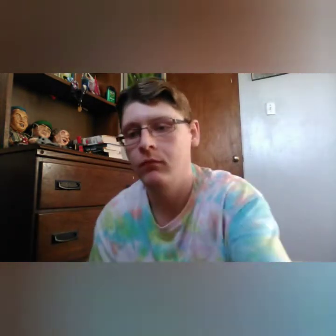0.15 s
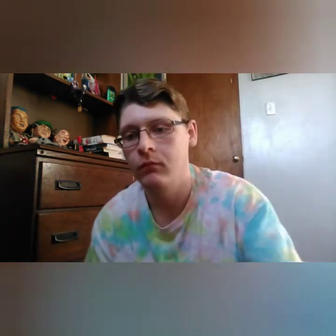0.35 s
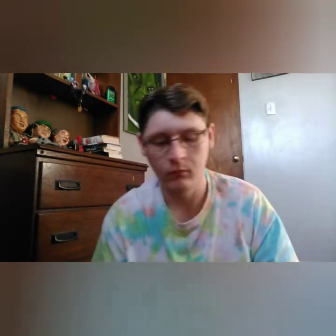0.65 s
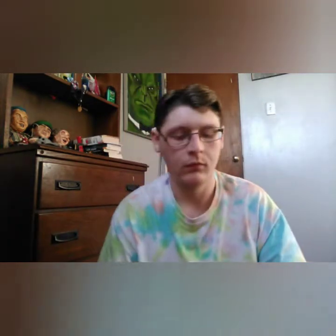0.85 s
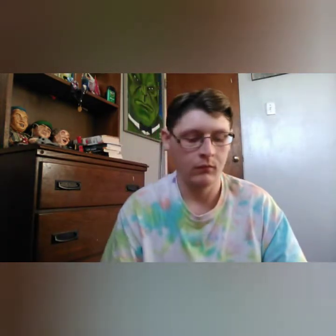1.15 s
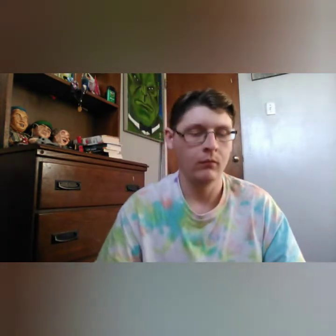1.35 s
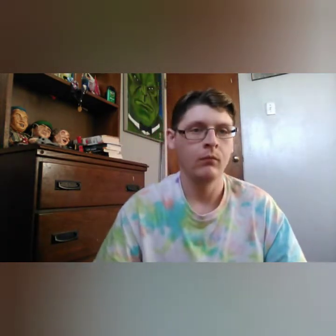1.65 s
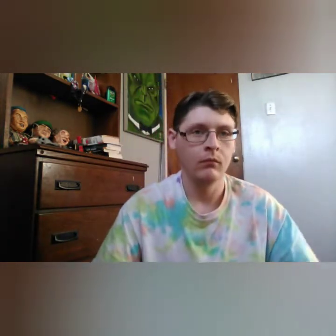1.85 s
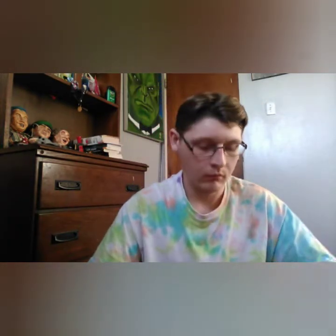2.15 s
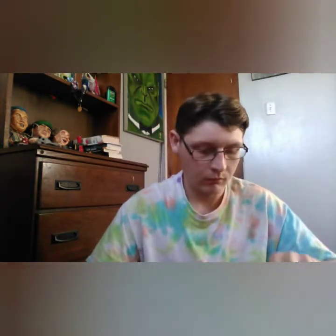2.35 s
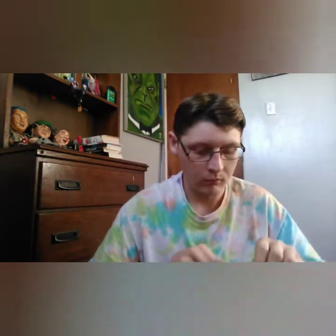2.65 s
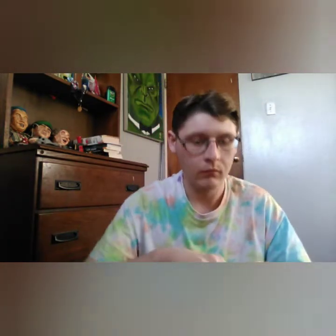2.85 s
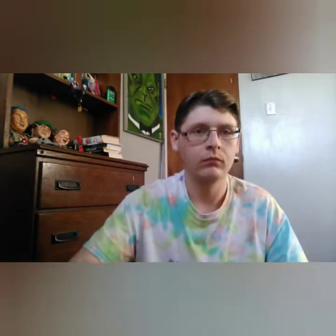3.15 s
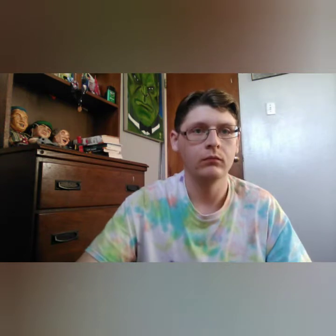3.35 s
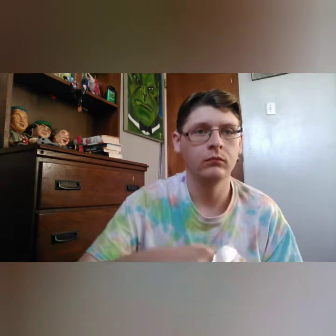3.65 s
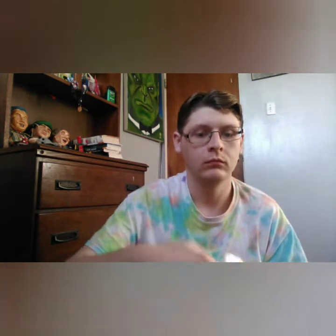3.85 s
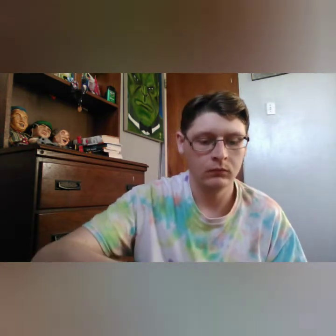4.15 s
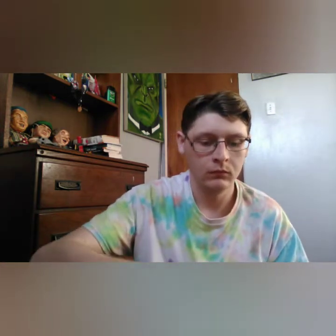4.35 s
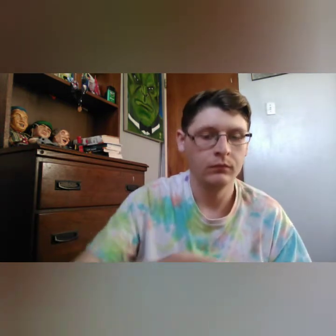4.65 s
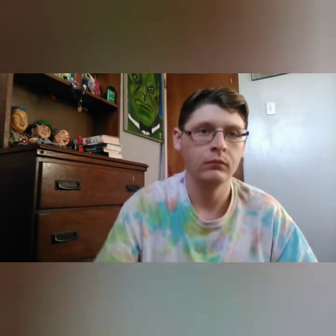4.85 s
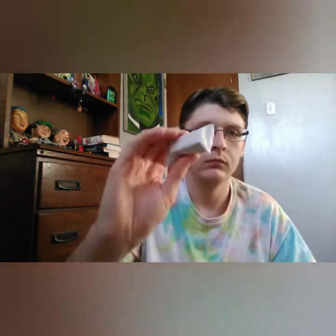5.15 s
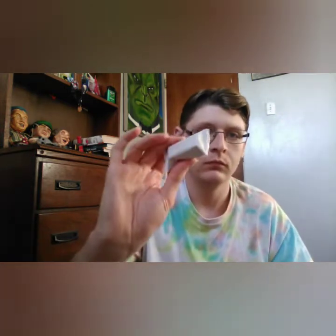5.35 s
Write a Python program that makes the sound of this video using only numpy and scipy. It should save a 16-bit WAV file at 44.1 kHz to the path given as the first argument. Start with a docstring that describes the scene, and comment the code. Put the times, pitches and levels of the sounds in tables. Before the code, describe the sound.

A close stereo phone microphone in a small bedroom catches a stiff plastic candy wrapper handled over a table. For the first 0.7 seconds there are mainly soft, dull thumps, a tiny crisp tick at 0.24, low rumble and a faint wavering drone that then fades. From 0.8 the wrapper crackles in scattered dry snaps, moving from the right to the centre. Snaps thicken from 1.5, and between 1.9 and 2.2 it tears open in a loud, bright, dense burst with short hollow pops. A quieter gap follows, with a crisp crackle and papery pops around 2.7 to 2.9. From 3.2 to 4.6 irregular crumpling continues, sharp cracks over fine grainy rustle, strongest near 3.3, 3.6, 4.1 and 4.2. It thins out, with crackles around 5.0 to 5.15, near quiet, and a last thin, sharp snap at 5.4. Brief room echoes and light hiss remain.

```python
"""Candy wrapper torn open and crumpled

A stiff plastic wrapper is picked up, torn open and crumpled by hand on a table in a small bedroom, caught by a
two-port phone microphone. Creases snap as short noise cracks, swarms of tiny buckles rustle as grainy noise, and
the air pocket pops as brief sagging tones. The table and walls answer with echoes. Soft thumps, a low house rumble,
a fading drone and hiss lie behind."""
import sys
import numpy as np
from scipy import signal
from scipy.fft import rfft, irfft, next_fast_len
from scipy.io import wavfile
from scipy.ndimage import uniform_filter1d, map_coordinates

SR = 44100
rng = np.random.default_rng(int(sys.argv[2]) if len(sys.argv) > 2 else 0)


def inscribe(sig):
    """Save sig as 16-bit PCM at rate SR to the path in sys.argv[1].

    A 1-D sig is mono; a 2-D sig holds one channel per row.
    Samples are clipped to [-1, 1] before scaling.
    """
    pcm = np.round(np.clip(np.atleast_2d(sig).T, -1, 1) * 32767)
    wavfile.write(sys.argv[1], SR, pcm.astype(np.int16))


N = 243431


def snaps():
    """Each crease flips in a crack of a few milliseconds; the table top throws it back and neighbours follow."""
    # creases that snap: t/s, level/dB, fullness/dB (middle band over treble)
    creases = [(0.1915, -38, 4.5), (0.238, -17.5, -16), (0.717, -78, 16), (.82, -22.5, -4.5),
               (.83, -18.5, -6), (.854, -13, -2.5), (0.98, -52.5, 1.5), (1.0974, -15, -8.5),
               (1.113, -29, 2.5), (1.1554, -25.5, -10.5), (1.2581, -18, -3), (1.5338, -20, -2.5),
               (1.5769, -22.5, -2), (1.6046, -20, 2.5), (1.755, -28, 4), (1.7684, -15, -3),
               (1.8084, -16, -8.5), (1.8348, -19, 3.5), (1.8842, -14.5, 1.5), (1.9, -3.5, -13),
               (1.9389, -6, -8), (1.9533, -2.5, -11), (1.975, -9, -7.5), (1.988, -3.5, -18),
               (2.0, -8, -12.5), (2.012, -8.5, -8), (2.1188, -18.5, 6.5), (2.1278, -13.5, -9),
               (2.1606, -7, -11), (2.215, -17, -1), (2.4062, -30.5, -14), (2.4724, -41, 11.5),
               (2.51, -41, 3.5), (2.7187, -13, -3), (2.8055, -26, -7.5), (2.85, -24.5, -14),
               (3.048, -57, 3), (3.1635, -25.5, -5.5), (3.2275, -24, 3.5), (3.285, -18.5, -16),
               (3.2953, -6.5, -7), (3.368, -22.5, 0), (3.395, -16, -5), (3.4983, -46, 17), (3.511, -46, 12),
               (3.5531, -30, -10.5), (3.5934, -20.5, 2), (3.6009, -10.5, -16.5), (3.6377, -11, -1.5),
               (3.8365, -18, -5), (3.9418, -10, -6.5), (3.984, -20, -1), (4.0753, -8.5, -15),
               (4.089, -22.5, -0.5), (4.2247, -7, -7), (4.2603, -19.5, 2.5), (4.2757, -14, -3),
               (4.3127, -29, 13), (4.344, -15, -17), (4.398, -28, 4.5), (4.4243, -23, -8.5),
               (4.4454, -21.5, -8), (4.4816, -17, -13.5), (4.588, -13.5, -8), (4.599, -16.5, 0.5),
               (4.7337, -29, -7), (4.796, -40.5, 1), (4.817, -31, -8), (4.956, -13, -2.5),
               (4.993, -20, -39), (5.003, -16.5, -10), (5.0946, -11.5, -15), (5.4234, -12, -24),
               (5.445, -24.5, -3.5), (5.478, -21, -7)]
    rise_s, t60_s, flip_t60_s = 0.0002, 0.007, 0.0037  # the first flip is the shortest
    echo_least_s, echo_scatter_s, echo_db = 0.0021, 0.0003, -4  # the table top's answer
    # neighbouring creases give way within this time, at most this loud, the later the weaker
    after_s, after_db, after_scatter_db = 0.04, -12.5, 12
    click_db, click_slope = 9.5, 0.26  # the bare step that starts a flip, sharper in loud snaps
    pocket_db, place_scatter_db = -9, 2.5

    t = np.arange(2400) / SR
    trains = np.zeros((3, 2, N + len(t)))  # three parts of the wrapper, each as mid and side

    def crack(at, fall_s=t60_s):
        return np.clip((t - at) / rise_s, 0, 1) * amp(-60 * np.abs(t - at) / fall_s)

    for s, db, full_db in creases:
        echo_s = echo_least_s + echo_scatter_s * rng.uniform()
        shape = crack(0, flip_t60_s) + amp(echo_db) * crack(echo_s)
        for weak, late in rng.uniform(size=(5, 2)):
            shape += amp(after_db - after_scatter_db * (weak + late)) * crack(after_s * late)
        burst = shape * rng.standard_normal((3, 2, len(t)))
        burst *= np.linalg.norm(shape) / np.linalg.norm(burst, axis=2, keepdims=True)
        # one step for the flip, a weaker one for its echo; a random share of both goes to the side
        steps = amp(click_db + click_slope * db + np.array([0, 2 * echo_db]))
        side_share = rng.uniform(-0.58, 0.55)
        burst[..., [round(rise_s * SR), round(echo_s * SR)]] += steps * [[1], [side_share]]
        gains = buckle_gains(s, db, full_db, pocket_db)
        trains[..., round(s * SR):][..., :len(t)] += burst * gains[:, None, None]

    # each crease sits somewhere else on the film; its place is taken up 3 ms ahead of the snap
    latest = np.searchsorted(np.array(creases)[:, 0] - 0.003, np.arange(N) / SR)
    side_db = place_scatter_db * rng.standard_normal(len(creases) + 1)[latest]
    return mottled(wrapper(*trains[..., :N]), depth_db=2.5) * amp([side_db / 2, -side_db / 2])


def rustle():
    """Squeezed film buckles in clumps, a few large among many small; each part has buckles of its own too."""
    # swarms of tiny buckles: middle t/s, half length/s, level/dB, fullness/dB (middle band over treble)
    swarm_rows = [(0, 0.037, -67.5, -14), (0.168, 0.011, -82, 19), (0.256, 0.017, -37.5, -5.5),
                  (0.321, 0.065, -48.5, -17), (0.599, 0.0085, -47, -3.5), (1.097, 0.005, -34, -11.5),
                  (1.582, 0.031, -41, -2), (1.745, 0.087, -47.5, -17), (1.858, 0.092, -40, -3),
                  (1.908, 0.019, -27.5, -0.5), (1.96, 0.029, -25, 0), (1.995, 0.02, -11, -11.5),
                  (2.026, 0.019, -20, -5), (2.138, 0.009, -29.5, 1.5), (2.223, 0.026, -61.5, 17),
                  (2.588, 0.024, -48.5, -11.5), (2.738, 0.0074, -27, -7), (2.861, 0.018, -40.5, 6.5),
                  (3.063, 0.015, -41.5, -3), (3.188, 0.097, -50.5, -22), (3.357, 0.11, -45.5, -1),
                  (3.543, 0.036, -44.5, -9.5), (3.61, 0.018, -33.5, -2.5), (3.713, 0.028, -37.5, -4),
                  (3.856, 0.063, -41, -4.5), (3.954, 0.036, -39.5, -28), (4.054, 0.063, -34.5, -1),
                  (4.102, 0.003, -23, -12.5), (4.2, 0.0036, -26.5, -9.5), (4.28, 0.16, -39.5, -4),
                  (4.466, 0.12, -28.5, -10.5), (4.6, 0.042, -34, -3), (4.812, 0.051, -51, -18),
                  (4.949, 0.014, -42, -10.5), (5.117, 0.0025, -22.5, -23), (5.135, 0.034, -33, -4),
                  (5.319, 0.027, -51.5, -0.5)]
    # the table shaken by hard squeezes: f/Hz, relative level/dB
    table_colour = [(20, -17), (60, -3), (170, -1), (300, -5), (600, -37.5)]
    typical_rate_hz, buckle_t60_s = 810, 0.0034
    # a harder squeeze pumps the pocket more than it adds crackle
    pocket_db, pump_slope, pump_from_db = -1.5, 0.27, -36.5

    chance = typical_rate_hz / SR * amp(6.5 * wobble(30))
    struck = rng.uniform(size=(4, N)) < chance
    sizes = struck * amp(np.minimum(4 * rng.exponential(size=(4, N)), 11))
    swarm = unit(signal.lfilter([1], [1, -amp(-60 / (buckle_t60_s * SR))], sizes))
    # steady power, buckles shared by all parts, and buckles of each part alone
    own_power = np.array([[0.12], [0.2], [0.4]]) * swarm[1:] ** 2
    grain = np.sqrt(0.27 + 0.27 * swarm[0] ** 2 + own_power)

    levels, t = np.zeros((3, N)), np.arange(N) / SR
    for s, half, db, full_db in swarm_rows:
        near = slice(max(0, round((s - 3 * half) * SR)), round((s + 3 * half) * SR))
        pumped_db = pocket_db + pump_slope * (db - pump_from_db)
        swell = np.exp(-((t[near] - s) / half) ** 2)
        levels[:, near] += buckle_gains(s, db, full_db, pumped_db)[:, None] * swell
    excitation = (levels * grain)[:, None] * rng.standard_normal((3, 2, N))
    film = mottled(wrapper(*excitation), depth_db=3.0)
    # hard squeezes also shake the table under the phone
    shake = filtered(levels[2] * rng.standard_normal((2, N)), band(lambda hz: amp(along(table_colour, hz))))
    return film + amp(-21.0) * spread(shake)


def buckle_gains(s, db, full_db, pocket_db):
    """Gains of crisp edge, film and air pocket for one buckle: a fuller buckle moves more air."""
    pocket_slope = 1.54  # pocket dB per dB of fullness
    lift_s, lift_db = 5.25, -31  # held up by one corner, the pocket nearly falls silent
    air_db = pocket_slope * full_db + pocket_db + lift_db * (s > lift_s)
    return amp(db + np.array([0, full_db, air_db]))


def wrapper(treble, middle, pocket):
    """Three excitations sound through the crisp edge, the film and the resonant air pocket of the wrapper."""
    # treble of the crisp edge: f/Hz, relative level/dB
    crisp_colour = [(2500, -81.5), (5000, -6), (6800, -4), (8300, 2.5), (9700, 5), (11300, 0), (13400, -1),
                    (14500, -4.5), (14900, -43), (16300, -49)]
    # middle band of the film: f/Hz, relative level/dB
    film_colour = [(600, -74), (1200, -44.5), (1700, -7), (2600, -1), (4500, -3.5), (6500, -7.5),
                   (8000, -12), (11000, -69.5)]
    # resonances of the air pocket at middle size: f/Hz, width/Hz, relative level/dB
    pocket_modes = [(321, 92, -6.5), (582, 390, -2), (677, 280, 0), (1122, 307, 2), (1410, 800, -6.5)]
    swing = 0.13  # the hands change the pocket's size, so its pitch wanders by about this share

    def ring(f):
        total = 0
        for k, (c, w, db) in enumerate(pocket_modes):
            total = total + (-1) ** k * amp(db) * 1j * f * w / (c * c - f * f + 1j * f * w)
        return total

    crisp = filtered(treble, band(lambda hz: amp(along(crisp_colour, hz))))
    film = filtered(middle, band(lambda hz: amp(along(film_colour, hz))))
    # crossfade between a large and a small pocket
    size = np.pi / 4 * (1 + np.tanh(2 * wobble(22)))
    large = filtered(np.cos(size) * pocket, band(lambda f: ring(f * (1 + swing))))
    small = filtered(np.sin(size) * pocket, band(lambda f: ring(f * (1 - swing))))
    return spread(crisp + film + large + small)


def mottled(x, depth_db):
    """Every few milliseconds another fold sounds, in another colour: random gains over time and frequency."""
    z = signal.stft(x, nperseg=256)[2]
    field = uniform_filter1d(rng.standard_normal(z.shape[1:]), size=6, axis=0)
    field = uniform_filter1d(field, size=2, axis=1)
    gain = amp(depth_db * unit(field))
    return signal.istft(z * unit(gain), nperseg=256)[1][:, :N]


def placed(x):
    """Left-right level from where the wrapper is, top treble from how the film is turned."""
    # the wrapper's place, brought in from the right: t/s, left over right level/dB
    side_rows = [(0, -22), (.8, -3.5), (1.6, 0.5), (2.7, -1.5), (3.2, -2), (4.3, -0.5), (4.6, -0.5),
                 (5.52, -1)]
    # gain of the top treble as the film turns: t/s, level/dB
    sheen_rows = [(0, 8), (1.2, -4.5), (1.9, 0), (2.3, 1), (2.75, 10.5), (3.1, -0.5), (3.7, 0), (4.3, 0.5),
                  (5.52, 2.5)]
    sheen_hz = 10700
    side_db, = curves(side_rows)
    sheen_db, = curves(sheen_rows)
    top = filtered(x, lambda hz: 1 / (1 + (sheen_hz / (hz + 1)) ** 16))
    x = x + (amp(sheen_db) - 1) * top
    return x * amp([side_db / 2, -side_db / 2])


def pops():
    """The squeezed air pocket rings for a few cycles, slightly rough and sagging in pitch, alike at both ports."""
    # dull pops: t/s, level/dB, f/Hz
    pop_rows = [(0.828, -29.5, 1010), (0.852, -21, 1042), (0.878, -33, 990), (1.115, -26.5, 1092),
                (1.563, -24.5, 1276), (1.607, -19, 1540), (1.833, -19, 1013), (1.858, -17.5, 1087),
                (1.9, -10, 987), (1.977, -16, 486), (2.119, -13.5, 1102), (2.24, -21, 1267),
                (2.472, -44, 955), (2.64, -40.5, 1024), (2.717, -25, 477), (2.767, -25.5, 1026),
                (2.792, -25, 1080), (2.835, -22, 950), (2.852, -12.5, 940), (2.873, -19.5, 1390),
                (3.242, -23.5, 1090), (3.378, -21.5, 1240), (3.509, -28, 1030), (3.529, -33.5, 1080),
                (3.596, -22, 1104), (3.601, -22.5, 1038), (3.879, -23, 1104), (4.049, -29.5, 373),
                (4.058, -17.5, 1015), (4.253, -22.5, 1040), (4.269, -23, 1105), (4.312, -19, 848),
                (4.316, -24, 445), (4.403, -31.5, 710), (4.609, -29.5, 803), (4.955, -25, 797),
                (5.086, -23.5, 1305), (5.096, -20, 971), (5.124, -29.5, 450), (5.155, -25, 504),
                (5.351, -42, 1080)]
    cycles, rise_s = 12.4, 0.00074  # cycles to fall 60 dB
    sag, puff_db = 0.016, -11  # share of pitch lost per cycle; rough air in the ring
    out, t = np.zeros(N + 2000), np.arange(2000) / SR
    for s, db, hz in pop_rows:
        puff = unit(uniform_filter1d(rng.standard_normal(len(t)), size=24))
        tone = np.sin(2 * np.pi * hz * t * (1 + sag * (1 - hz * t / 2)))
        fade = amp(-60 * t * hz / cycles) * (1 - np.exp(-(t / rise_s) ** 2))
        out[round(s * SR):][:len(t)] += amp(db) * (1 + amp(puff_db) * puff) * tone * fade
    return np.array([out[:N], out[:N]])


def walls(x):
    """Diffuse echoes build up within 1.4 ms and die by band; the hands move, so the pattern keeps changing."""
    # decay of the small room: f/Hz, time to fall 60 dB/s
    decay = [(300, 0.15), (2000, 0.19), (6000, 0.22), (14000, 0.22)]
    step, length = 4096, 20480  # samples per echo pattern, samples of tail
    out = np.zeros((2, N + SR))
    for at in range(0, N, step):
        hz, t, z = signal.stft(rng.standard_normal((2, length)), SR, nperseg=256)
        fading = z * amp(-60 * t / along(decay, hz)[:, None])
        tail = signal.istft(fading, SR, nperseg=256)[1][:, :length]
        tail = tail * np.clip(np.arange(length) / SR / 0.0014, 0, 1) ** 2
        alike = 0.29 * tail.sum(axis=0) + 1.5 * tail
        source = x[:, at:at + step].mean(axis=0)[None]
        echo = signal.fftconvolve(source, alike / np.linalg.norm(alike[0]), axes=1)
        out[:, at:at + echo.shape[1]] += echo
    return out[:, :N]


def thumps():
    """Arms and fingers thump softly through the table: sines that swell and die, nearer the right port."""
    # thumps: t/s, level before the slow swell/dB, f/Hz
    thump_rows = [(0.131, -31, 310), (0.184, -34.5, 62.3), (0.185, -28, 320), (0.247, -27, 305),
                  (0.389, -30.5, 157), (0.517, -31, 362), (0.591, -31.5, 354), (2.005, -33, 93.3),
                  (2.851, -29.5, 128.3), (3.624, -41.5, 78.6), (5.479, -45.5, 73)]
    cycles, rise_s, side_db = 12, 0.016, -7.5  # cycles to fall 60 dB; left over right
    out, t = np.zeros(N + 8000), np.arange(8000) / SR
    for s, db, hz in thump_rows:
        swell = 1 - np.exp(-t / rise_s)
        out[round(s * SR):][:len(t)] += amp(db - 60 * t * hz / cycles) * np.sin(2 * np.pi * hz * t) * swell
    return out[:N] * amp([[side_db / 2], [-side_db / 2]])


def house():
    """Shaped noise: a lumpy rumble, a wavering drone that fades, and the microphone's hiss."""
    # rumble before its lumps: t/s, level/dB
    rumble_rows = [(0.0, -58), (1.72, -67), (5.52, -69)]
    # colour of the rumble: f/Hz, relative level/dB
    rumble_colour = [(15, -40.5), (25, -23.5), (60, 3.5), (110, 5.5), (160, -9), (230, -17.5), (300, -30.5),
                     (600, -89)]
    # bands of the drone: f/Hz, half width/Hz, relative level/dB
    drone_bands = [(148, 40, 2.5), (351, 17, 2.5), (714, 25, -17)]
    # colour of the hiss: f/Hz, relative level/dB
    hiss_colour = [(200, -31.5), (500, 4), (2200, -4), (3500, -11), (9800, -2.5), (14000, -6), (15000, -39)]
    drone_db, hold_s, fade_s, drop_db = -60.5, 0.7, 0.75, 24

    def noise(response):
        return unit(filtered(spread(rng.standard_normal((2, N))), response))

    def drone_response(hz):
        return sum(amp(db) / (1 + ((hz - c) / w) ** 2) for c, w, db in drone_bands)

    rumble_db = curves(rumble_rows)[0] + 2.2 * wobble(5)
    rumble = amp(rumble_db) * noise(lambda hz: amp(along(rumble_colour, hz)))
    faded = 1 - np.exp(-np.clip(np.arange(N) / SR - hold_s, 0, None) / fade_s)
    drone = amp(drone_db - drop_db * faded + 1.1 * wobble(33)) * noise(drone_response)
    hiss = amp(-75.0) * noise(lambda hz: amp(along(hiss_colour, hz)))
    return rumble + drone + hiss


def spread(pair):
    """Two unrelated signals, taken as mid and side, mixed to the likeness that the two ports hear."""
    # likeness of the ports: f/Hz, left-right correlation (1 = the same)
    likeness = [(60, 0.54), (130, 0.99), (250, 0.66), (500, 0.9), (1400, 0.13), (3000, 0.097),
                (14000, 0.23)]

    def mid_side(hz):
        turn = np.arccos(np.clip(along(likeness, hz), -1, 1)) / 2
        return np.array([np.cos(turn), np.sin(turn)])

    mid, side = filtered(pair, mid_side)
    return np.array([mid + side, mid - side])


def amp(db):
    """Amplitude factor of a level in dB."""
    return 10 ** (np.asarray(db) / 20)


def unit(x):
    """x scaled to an rms of 1."""
    return x / np.sqrt(np.mean(x ** 2) + 1e-20)


def along(points, hz):
    """Values between (Hz, value) points on a log axis."""
    f, v = np.transpose(points)
    return np.interp(np.log(hz + 1), np.log(f + 1), v)


def curves(rows):
    """One value per sample for each column after the time."""
    s, *cols = np.transpose(rows)
    return [np.interp(np.arange(N) / SR, s, c) for c in cols]


def wobble(rate):
    """A smooth random curve, rate knots a second."""
    return map_coordinates(rng.standard_normal(int(N * rate / SR) + 4), [np.arange(N) * rate / SR])


def filtered(x, response):
    """x times a response of frequency."""
    m = next_fast_len(N + 8192)
    return irfft(rfft(x, m) * response(np.fft.rfftfreq(m, 1 / SR)), m)[..., :N]


def band(response):
    """The response scaled so that white noise keeps its rms."""
    return lambda hz: response(hz) / np.sqrt(np.mean(np.abs(response(hz)) ** 2))


def scene():
    """The wrapper and its pops, their answer from the walls, the house and the thumps."""
    crackle, pocket = placed(snaps() + rustle()), pops()
    echoes = amp(-4.0) * walls(crackle + amp(-3.5) * pocket)
    return crackle + pocket + echoes + house() + thumps()


def record(dry):
    """The two ports differ in colour, the loudest cracks round off, the microphone dulls and then cuts the top."""
    # difference of the ports: f/Hz, left over right level/dB
    port_colour = [(60, -2.5), (200, -1), (500, 1), (1300, -1.5), (4400, 0), (8100, -5.5), (9800, -10.5),
                   (11500, 4.5), (13500, 7)]
    edge_hz, edge_db, top_hz = 14600, -10, 16473  # dulled within 300 Hz above the edge; nothing from top_hz up

    def port_gains(hz):
        side_db = along(port_colour, hz)
        return amp([side_db / 2, -side_db / 2])

    ports = filtered(dry, port_gains)
    soft = ports / (1 + np.abs(ports / 0.85) ** 5) ** (1 / 5)
    return filtered(soft, lambda hz: (hz < top_hz) * amp(edge_db * np.clip((hz - edge_hz) / 300, 0, 1)))


dry = scene()
out = record(dry)
inscribe(out)
```